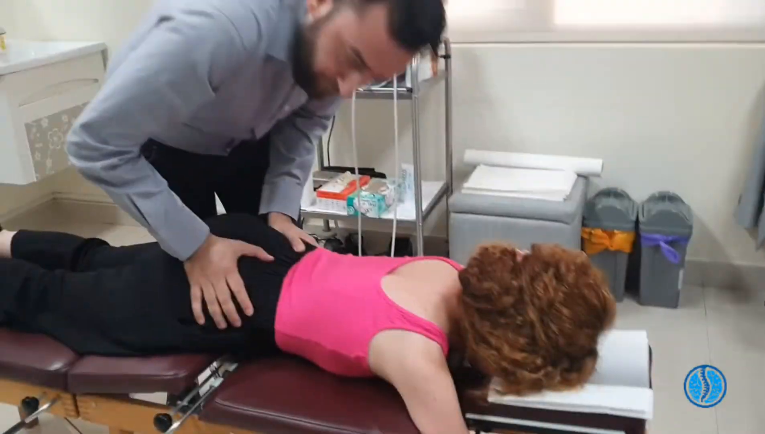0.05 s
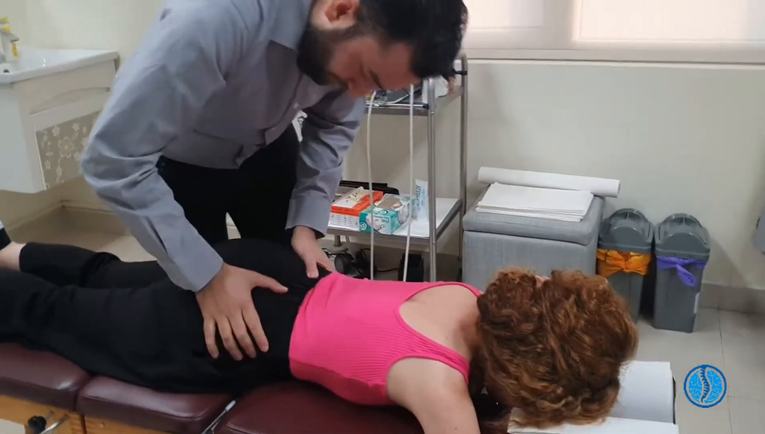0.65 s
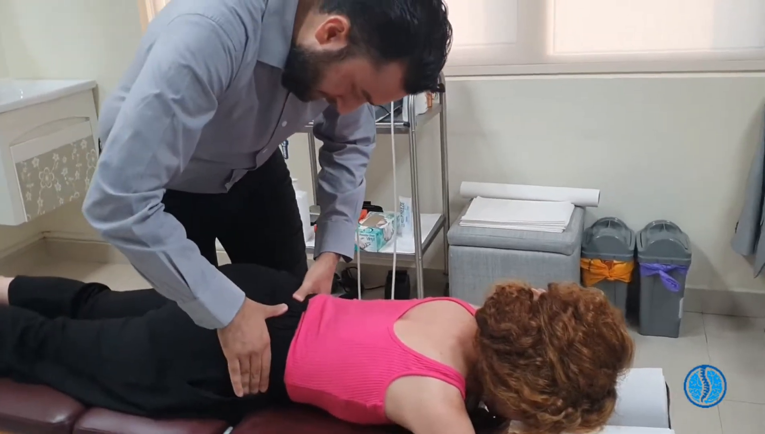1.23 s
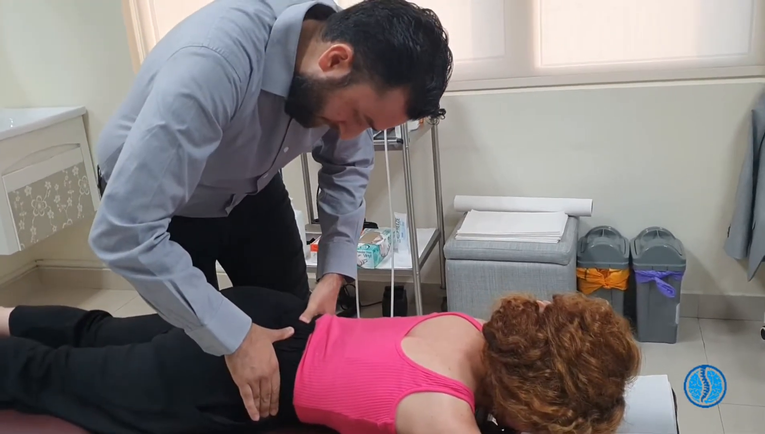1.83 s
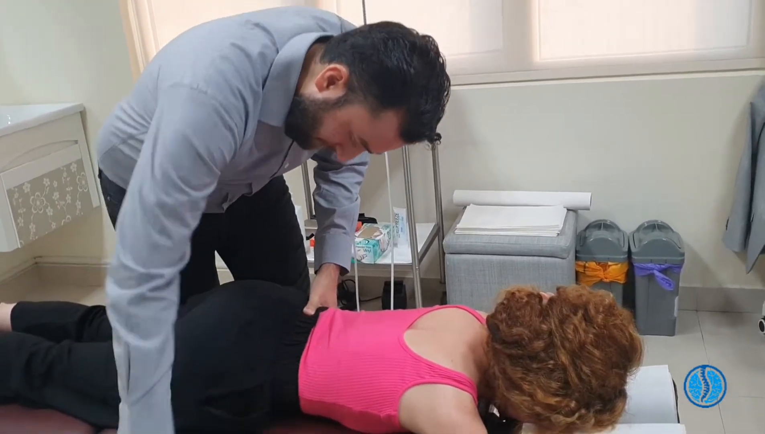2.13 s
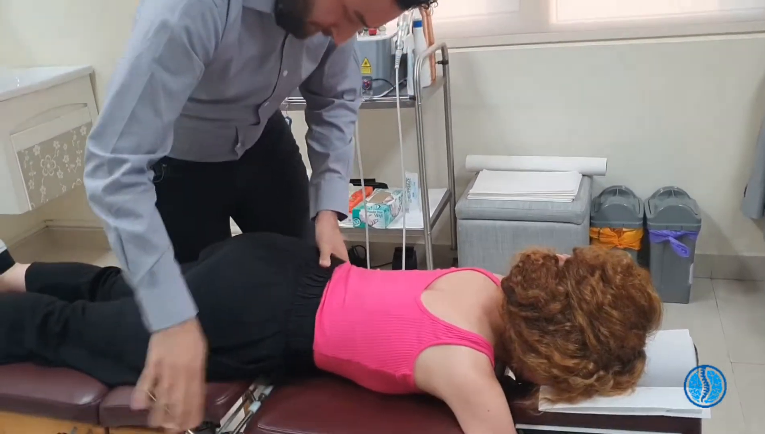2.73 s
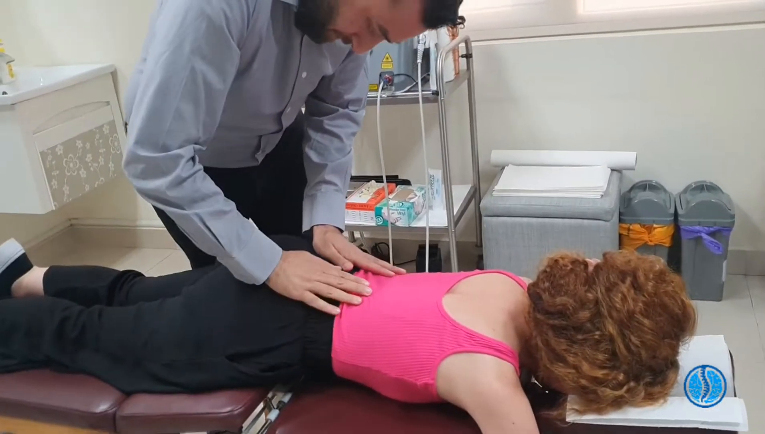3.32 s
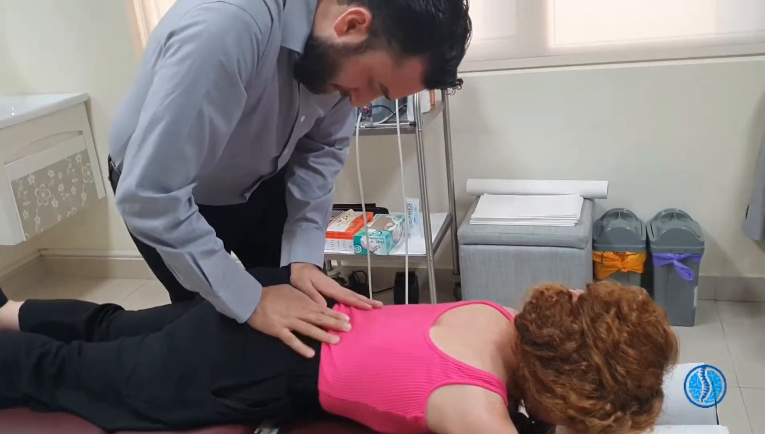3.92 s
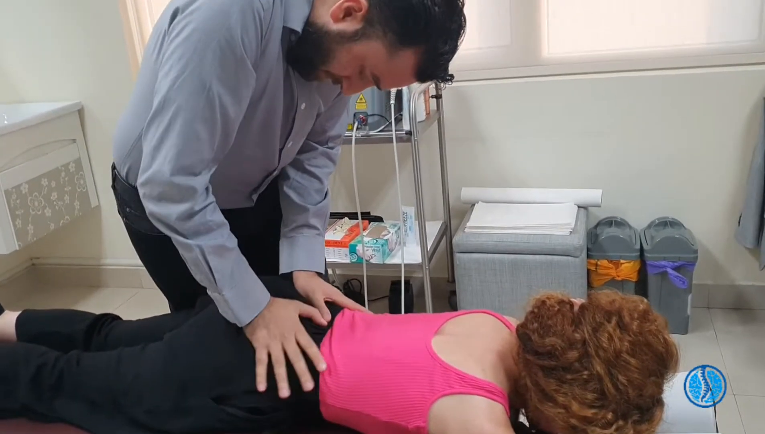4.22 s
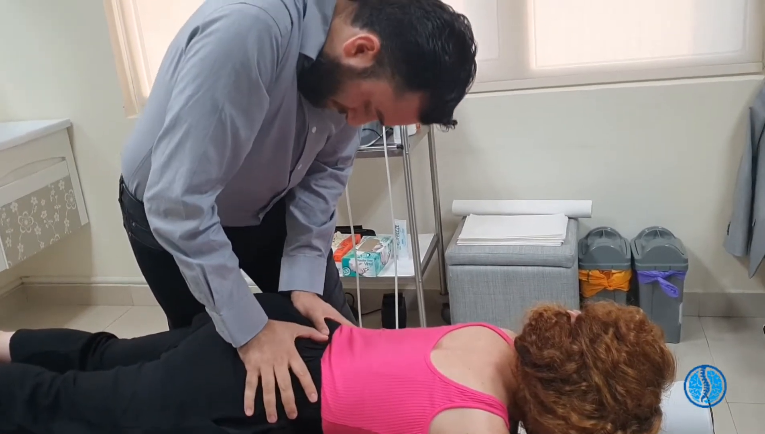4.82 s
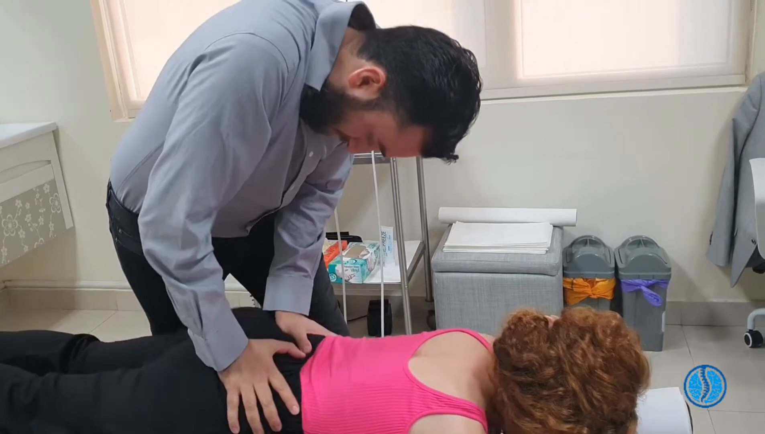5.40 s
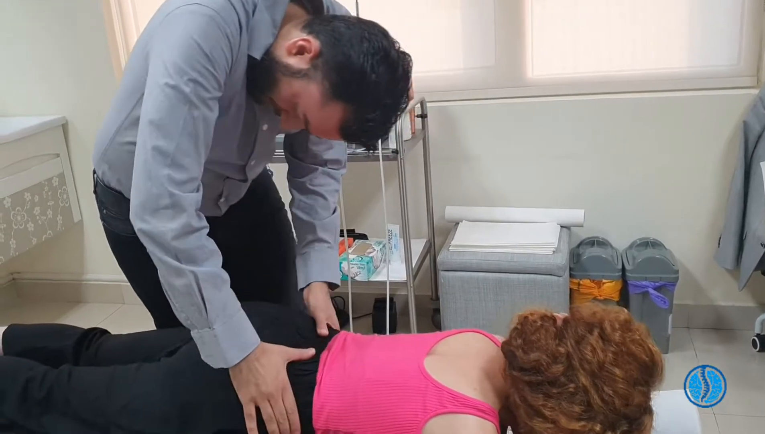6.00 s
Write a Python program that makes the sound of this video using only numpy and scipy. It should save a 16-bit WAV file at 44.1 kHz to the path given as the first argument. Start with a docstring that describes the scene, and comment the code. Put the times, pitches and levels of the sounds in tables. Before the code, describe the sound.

Heard from close by, a loud mechanical clack and thud rings through a small room as a treatment table section drops. Midway, its lever slides with a gritty rub and catches in a cluster of bright metal knocks. A second, equally heavy slam comes near the end. Low ventilation hums throughout, dipping after each slam, with slight creaks of padding and soft swishes of hands on cloth.

```python
"""A small, hard-walled clinic room: the drop section of a padded treatment table is thrust down twice.
Each time the catch lets go, the section slams on its stop and the room booms. In between, a steel lever
scrapes, lifts and latches it again, and the frame rocks. Upholstery creaks, hands slide over clothes
and the ventilation hums. A nearby camera's gain control ducks at the slams and slowly recovers."""
import sys
import numpy as np
from scipy import signal
from scipy.fft import rfft, irfft, next_fast_len
from scipy.io import wavfile
from scipy.ndimage import uniform_filter1d, minimum_filter1d, map_coordinates

SR = 44100
rng = np.random.default_rng(int(sys.argv[2]) if len(sys.argv) > 2 else 0)


def to_wav(s):
    """Save 16-bit WAV."""
    ch = np.atleast_2d(s).T  # columns
    pcm = np.round(np.clip(ch, -1, 1) * 32767)  # PCM
    wavfile.write(sys.argv[1], SR, pcm.astype(np.int16))


N = 266849
TIME = np.arange(N) / SR
AGE = np.arange(int(1.5 * SR)) / SR  # seconds since a hit


def amp(db):
    return 10 ** (np.asarray(db) / 20)


def unit(x):
    return x / np.sqrt(np.mean(x ** 2) + 1e-20)


def along(points, hz):
    """Read a curve of (frequency, value) points on a log axis."""
    freqs, values = np.transpose(points)
    return np.interp(np.log(hz + 1), np.log(freqs + 1), values)


def attack(rise_s):
    """The rounded onset of a hit."""
    return 1 - np.exp(-AGE / rise_s)


def gesture(start, end, attack_s, fade_db_per_s):
    """Envelope of a slide: it rises, holds until its end, then fades in the room."""
    return np.clip((TIME - start) / attack_s, 0, 1) * amp(-fade_db_per_s * np.maximum(TIME - end, 0))


def wobble(rate, size):
    """A smooth random curve, rate knots a second."""
    knots = rng.standard_normal(int(size * rate / SR) + 4)
    return map_coordinates(knots, [np.arange(size) * rate / SR])


def add(track, s, sound):
    """Mix a sound in from time s on."""
    part = track[:, round(s * SR):][:, :sound.shape[-1]]
    part += sound[..., :part.shape[1]]


def colour(x, spectrum, tilt=0):
    """Minimum-phase EQ of unit power; tilt in dB per octave above 400 Hz."""
    size = 2 * next_fast_len(x.shape[-1] // 2 + 4096)
    hz = np.fft.rfftfreq(size, 1 / SR)
    gain = unit(amp(along(spectrum, hz) + tilt * np.log2(np.maximum(hz, 400))))
    cepstrum = irfft(np.log(np.maximum(gain, 1e-6)))
    cepstrum[1:size // 2] *= 2
    cepstrum[size // 2 + 1:] = 0
    return irfft(rfft(x, size) * np.exp(rfft(cepstrum)))[..., :x.shape[-1]]


# stereo image of the room: (frequency [Hz], left-right likeness [0-1])
STEREO_LIKENESS = [(60, 0.95), (150, .93), (280, 0.72), (500, .45), (900, 0.059), (15000, 0)]
def diffuse(size):
    """White noise from all sides: centred in the bass, wide above it."""
    likeness = along(STEREO_LIKENESS, np.fft.rfftfreq(size, 1 / SR))
    width = np.arccos(np.clip(likeness, -1, 1)) / 2
    mid, side = irfft(rfft(rng.standard_normal((2, size))) * [np.cos(width), np.sin(width)], size)
    return np.array([mid + side, mid - side])


# tones of the fan: (frequency [Hz], relative level [dB], waver [0-1])
FAN_TONES = [(45.3, 2, .15), (84.8, -9.5, 0.8), (147.6, 1.5, .11)]
# EQ of the moving air: (frequency [Hz], gain [dB])
AIR_EQ = [(120, -30), (200, -4.5), (390, -5.5), (476, -6), (521, -11.5), (761, -12), (1600, -30),
          (2290, -29), (4890, -41.5), (15000, -52.5)]
def ventilation():
    """The bed: a fan's wavering hum and rumble under a soft rush of air."""
    hum = np.zeros(N)
    for hz, db, waver in FAN_TONES:
        drift = 1 + waver * (wobble(14, N) + 1j * wobble(24, N))
        hum += amp(db) * np.real(drift * np.exp(2j * np.pi * hz * TIME))
    rumble_eq = [(25, -31.5), (42, -8), (70, -2), (110, -7), (160, -1.5), (260, -18), (500, -52.5)]
    fan = hum + amp(-7.5) * colour(diffuse(N), rumble_eq)
    return amp(-43.5) * fan + amp(-55) * colour(diffuse(N), AIR_EQ)


# strokes over clothes: (start [s], length [s], level [dB], tilt [dB/octave])
HAND_STROKES = [(0, 0.15, -62, -2.5), (2.1, 0.17, -67, .5), (2.778, 0.14, -56.5, 16), (3.946, 0.51, -67, 1),
                (5.88, 0.14, -59, -1)]
# EQ of the cloth's swish: (frequency [Hz], gain [dB])
CLOTH_EQ = [(710, -28), (1200, -1.5), (1630, -7.5), (2790, -5), (3990, -2.5), (5330, -8.5), (9770, -12.5),
            (14000, -25)]
def hands():
    """Palms and sleeves slide softly over clothes."""
    out = np.zeros((2, N))
    for s, length, db, tilt in HAND_STROKES:
        envelope = gesture(s, s + length, attack_s=0.053, fade_db_per_s=70.5)
        out += amp(db) * envelope * colour(diffuse(N), CLOTH_EQ, tilt)
    return out


# reverb of the hard walls: (frequency [Hz], base t60 [s])
ROOM_DECAY = [(100, 0.97), (300, 0.71), (1000, 0.69), (3000, 0.71), (6000, 0.61), (10000, 0.55),
              (15000, 0.19)]
def contact(crack_db, crack_t60, build_s, ripple_db, linger, softness=1):
    """A direct crack, then a darkening room tail; linger scales the tail's t60, softness both attacks."""
    size = len(AGE)
    # each blow wakes its own mix of the table's crowded upper modes
    bins_hz = np.fft.rfftfreq(size, 1 / SR)
    mode_mix = unit(amp(ripple_db * wobble(400, len(bins_hz)) * np.minimum(bins_hz / 700, 1)))
    wash = irfft(rfft(diffuse(size)) * mode_mix, size)
    hz, t, bands = signal.stft(wash, SR, nperseg=256)
    decay = amp(-60 * t / (linger * along(ROOM_DECAY, hz)[:, None]))
    tail = signal.istft(bands * decay, SR, nperseg=256)[1][:, :size]
    crack = unit(rng.standard_normal(size) + 1.6 * rng.standard_normal((2, size)))
    crack *= amp(crack_db - 60 * AGE / crack_t60) * attack(softness * 0.0014)
    flutter = amp(0.7 * wobble(250, size))
    return crack + tail * attack(softness * build_s) * flutter


def ring(modes, blur, blur_rate, spread):
    """Damped modes of a struck part; reflections blur their phase, and spread sets the sides apart."""
    sound = np.zeros((2, len(AGE)))
    for hz, db, t60 in modes:
        phase = rng.uniform(0, 2 * np.pi) + blur * wobble(blur_rate, len(AGE))
        phase = phase + spread * np.array([wobble(blur_rate, len(AGE)) for _ in range(2)])
        sound += amp(db + rng.normal() - 60 * AGE / t60) * np.sin(2 * np.pi * hz * AGE + phase)
    return sound * attack(0.005) / np.linalg.norm(amp([db for _, db, _ in modes]))


# hits of lever and catch: (time [s], clack level [dB], steel level [dB], clack tilt [dB/octave])
LATCH_HITS = [(.111, -52.5, -78.5, -0.5), (2.594, -23.5, -38, 2.5), (2.617, -26, -24.5, -6),
              (3.057, -15.5, -29.5, 2), (3.076, -15.5, -27.5, 0), (3.234, -20, -37, -.5),
              (3.333, -23.5, -38.5, -1.5), (5.305, -51, -80, -0.5)]
# EQ of their clack: (frequency [Hz], gain [dB])
CLACK_EQ = [(60, -40.5), (110, -13.5), (177, -2.5), (281, -9.5), (457, -4.5), (950, -9), (1300, -8.5),
            (2400, -10), (3200, -13), (3800, -10.5), (4860, -20.5), (7500, -25.5), (9000, -19),
            (11000, -31.5), (15200, -35)]
# EQ of the steel's dense upper modes: (frequency [Hz], gain [dB])
ZING_EQ = [(3000, -19), (5500, -3), (6700, -1.5), (7400, -9), (9000, -4), (10500, -3), (11700, -6.5),
           (13200, 1), (14200, -10.5), (15500, -14.5)]
# clear tones of the steel: (frequency [Hz], relative level [dB], t60 [s])
STEEL_MODES = [(2900, -6.5, 0.59), (3040, -5.5, .42), (5960, -8.5, 0.31), (6670, -9.5, .4), (8800, -5, 0.3),
               (9260, -8, .45), (10440, 2, 0.16), (12200, -6.5, .35)]
def latch():
    """Steel parts of the lever knock together: a clack with a bright ring on top."""
    out = np.zeros((2, N))
    for s, clack_db, steel_db, tilt in LATCH_HITS:
        clack = contact(crack_db=1.5, crack_t60=0.051, build_s=0.0028, ripple_db=3, linger=0.9)
        zing = contact(crack_db=3.14, crack_t60=0.06, build_s=0.0025, ripple_db=4, linger=0.88)
        steel = colour(zing, ZING_EQ) + amp(0.5) * ring(STEEL_MODES, blur=0.55, blur_rate=80, spread=0.9)
        add(out, s, amp(clack_db) * colour(clack, CLACK_EQ, tilt) + amp(steel_db) * steel)
    return out


# slips of upholstery and hinges: (time [s], pitch [Hz], level [dB])
CREAK_SLIPS = [(.112, 2740, -49), (2.157, 3000, -61.5), (2.357, 888, -49.5), (2.55, 2250, -41),
               (3.02, 2293, -57), (3.949, 3060, -62.5), (3.972, 850, -52.5), (5.303, 2417, -57)]
def creaks():
    """Under shifting weight, short slips sound through one broad resonance and hang in the room."""
    out = np.zeros((2, N))
    peak_shape = [(0.4, -46.5), (0.8, -14), (1, -2), (1.25, -11.5), (2, -28), (5, -45)]
    for s, hz, db in CREAK_SLIPS:
        resonance = [(hz * ratio, gain_db) for ratio, gain_db in peak_shape]
        slip = contact(crack_db=0, crack_t60=0.055, build_s=0.013, ripple_db=4, linger=0.85)
        add(out, s, amp(db) * colour(slip, resonance))
    return out


def board_punch(hz):
    """The first few heavy swings of the padded board."""
    return np.sin(2 * np.pi * hz * AGE) * amp(-60 * AGE / 0.068) * attack(0.0041)


# thrusts on the section: (time [s], clack level [dB], thud level [dB], base board pitch [Hz])
THRUSTS = [(0.2074, -0.5, -1.5, 226.9), (5.388, -1.5, 0, 271)]
# release, slam, rock, rebound: (offset [s], force [dB], thud trim [dB], board pitch [ratio])
DROP_STAGES = [(-.0245, -16.5, -19, 0.86), (0, -1, -1.5, 1.11), (.027, -14, -9, 1.4),
               (.052, -7.5, -6.5, 1.09)]
# EQ of the section hitting its stop: (frequency [Hz], gain [dB])
SLAM_EQ = [(55, -30.5), (100, -11), (310, -10.5), (415, -10.5), (590, -16), (740, -11.5), (830, -17),
           (1300, -17), (3500, -18.5), (4600, -24.5), (9000, -30), (13000, -34.5), (15200, -39)]
# body of the loaded frame: (frequency [Hz], relative level [dB], t60 [s])
FRAME_MODES = [(127.6, -5.5, 0.46), (175.7, 1, .75), (210.3, -4, 0.71), (252.9, 1, 0.67), (316, 2, 0.7),
               (350.7, -2.5, 0.52), (364.5, -1, 0.73), (387.4, -4.5, 0.67), (419.7, -7.5, 0.53),
               (499, -8.5, 0.55)]
def drop_section():
    """Each drop is four quick clacks and thuds, plus a boom; harder stages clack sharper and brighter."""
    out = np.zeros((2, N))
    for s, clack_db, thud_db, board_hz in THRUSTS:
        for offset, force_db, trim_db, ratio in DROP_STAGES:
            hit = contact(crack_db=3.5 + 0.05 * force_db, crack_t60=0.038, build_s=0.0085,
                          ripple_db=3, linger=1, softness=amp(-0.59 * force_db))
            clack = colour(hit, SLAM_EQ, tilt=0.05 * force_db)
            frame = ring(FRAME_MODES, blur=0.87, blur_rate=25, spread=0.17)
            thud = frame + amp(8.5) * board_punch(board_hz * ratio)
            add(out, s + offset, amp(clack_db + force_db) * clack + amp(thud_db + trim_db) * thud)
        add(out, s + 0.03, amp(thud_db - 12) * room_boom())  # the bass answers late and softer
    return out


# low end of the room: (frequency [Hz], relative level [dB], t60 [s])
BOOM_MODES = [(47.4, -15, 0.97), (71.6, 0.5, 1.5)]
def room_boom():
    """The room's low modes swell after a blow and outlast it."""
    modes = sum(amp(db - 60 * AGE / t60) * np.sin(2 * np.pi * hz * AGE) for hz, db, t60 in BOOM_MODES)
    return attack(0.027) * modes


# EQ of the lever's dull rub: (frequency [Hz], gain [dB])
RUB_EQ = [(120, -25), (200, -6), (642, -16), (757, -4.5), (855, -10.5), (1600, -19.5), (2080, -39.5),
          (3520, -120)]
# EQ of its gritty scrape: (frequency [Hz], gain [dB])
SCRAPE_EQ = [(600, -35.5), (1200, -18), (1950, -7), (2210, -1.5), (2550, -9.5), (4200, -10.5),
             (7000, -23.5), (14000, -39.5)]
def lever_slide(start_s=2.352, end_s=2.64):
    """The lever rubs along its guide, harder and brighter until it catches; the room lets it fade."""
    travel_left = np.clip((end_s - TIME) / (end_s - start_s), 0, 1)
    rub = amp(-40.5 - 7 * travel_left) * colour(diffuse(N), RUB_EQ)
    grit = diffuse(N) * amp(2 * wobble(300, N))
    scrape = amp(-36.5 - 24 * travel_left) * colour(grit, SCRAPE_EQ)
    return gesture(start_s, end_s, attack_s=0.011, fade_db_per_s=85) * (rub + scrape)


# rocks of the lifted section: (time [s], level [dB])
SETTLING_ROCKS = [(3.089, -30), (3.37, -33.5)]
def rocking():
    """The lifted section settles under its load: soft thuds of the frame, each with the room's boom."""
    out = np.zeros((2, N))
    for s, db in SETTLING_ROCKS:
        thud = ring(FRAME_MODES, blur=1.1, blur_rate=25, spread=0.251)
        add(out, s, amp(db) * (amp(-3.5) * thud + room_boom()))
    return out


def scene():
    return ventilation() + hands() + latch() + creaks() + drop_section() + lever_slide() + rocking()


def record(dry):
    """Gain control ducks the whole mix at each loud blow, holds, then creeps back."""
    threshold_db, duck_share, start_duck_db = -19, 0.49, 2
    attack_s, hold_s, recover_db_per_s = 0.0014, 0.84, 6.5
    power = uniform_filter1d(np.mean(dry ** 2, axis=0), size=300)
    level_db = 10 * np.log10(np.abs(power) + 1e-12)
    wanted_db = np.maximum(duck_share * (level_db - threshold_db), 0)
    half_hold = int(hold_s * SR / 2)
    held_db = -minimum_filter1d(-wanted_db, 2 * half_hold + 1, origin=half_hold, mode="nearest")
    recovery_db = recover_db_per_s * TIME
    duck_db = np.maximum.accumulate(np.maximum(held_db + recovery_db, start_duck_db)) - recovery_db
    pole = np.exp(-1 / (attack_s * SR))
    ducked = dry * amp(-signal.lfilter([1 - pole], [1, -pole], duck_db))
    soft_clipped = ducked / (1 + ducked ** 8) ** (1 / 8)
    high_cut = signal.ellip(10, 0.1, 70, 15250, fs=SR, output="sos")
    return signal.sosfilt(high_cut, soft_clipped)


dry = scene()
out = record(dry)
to_wav(out)
```